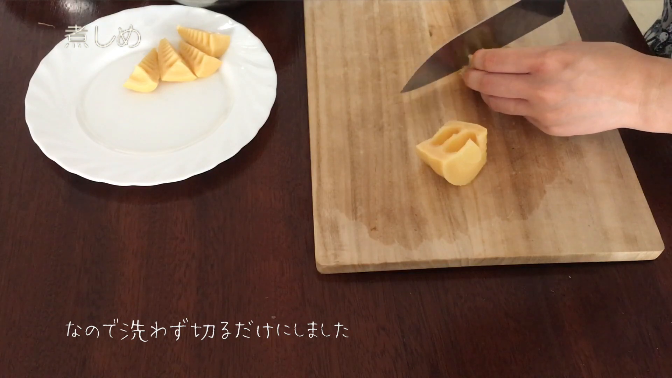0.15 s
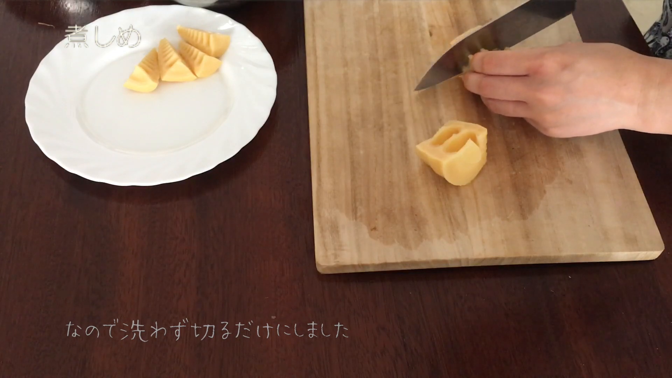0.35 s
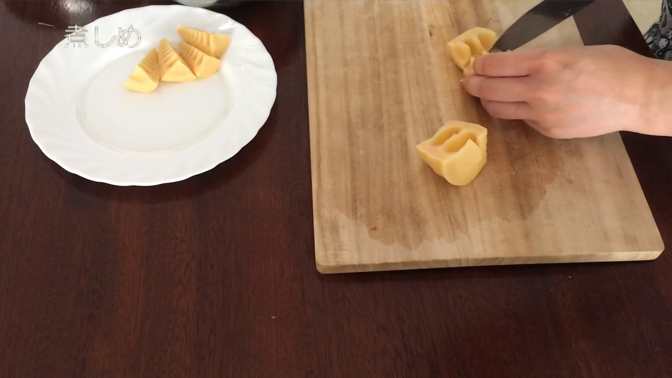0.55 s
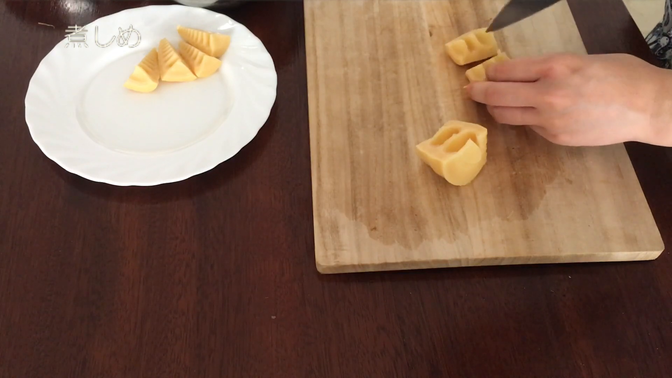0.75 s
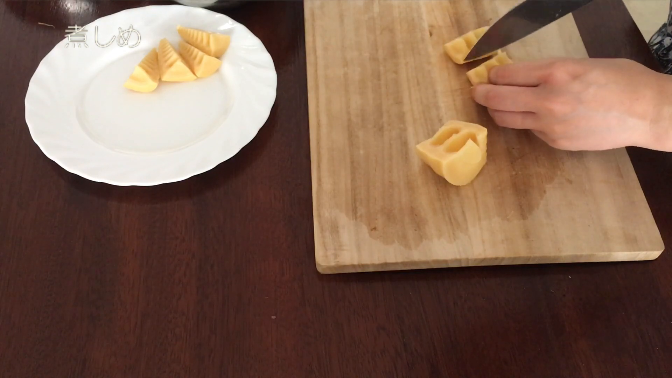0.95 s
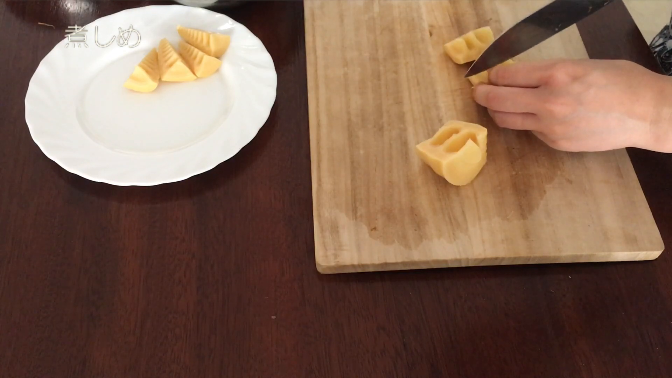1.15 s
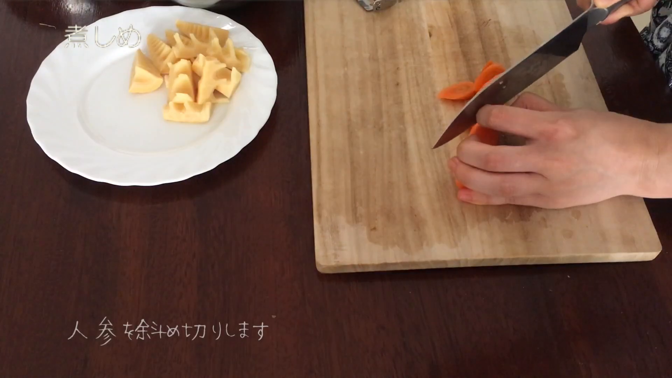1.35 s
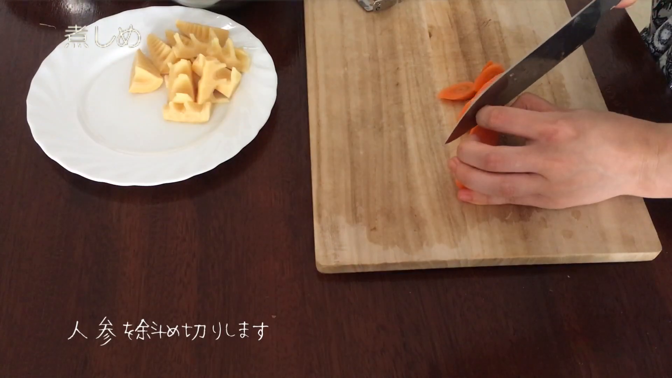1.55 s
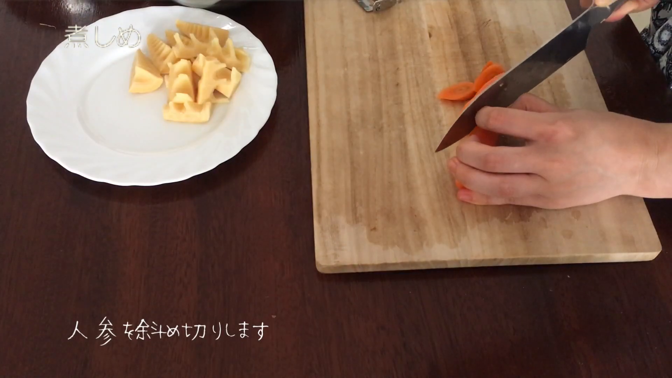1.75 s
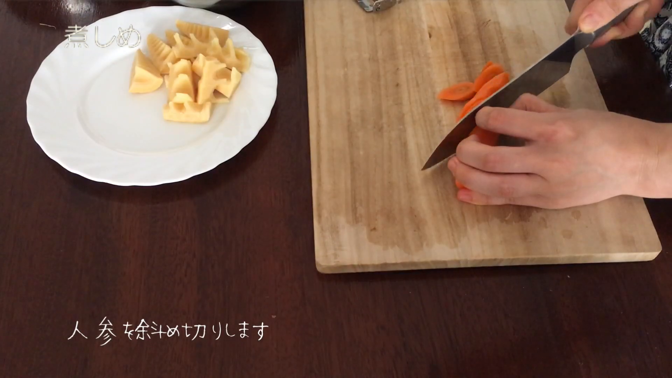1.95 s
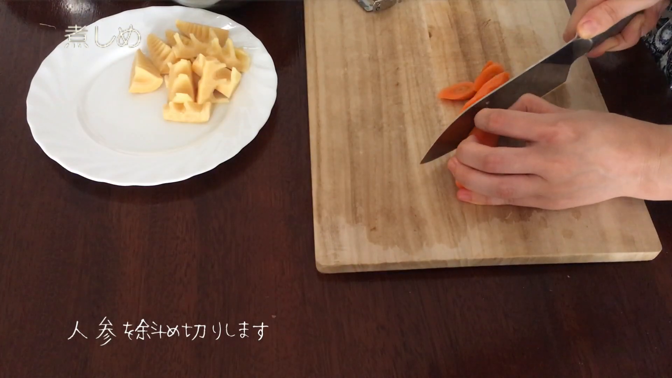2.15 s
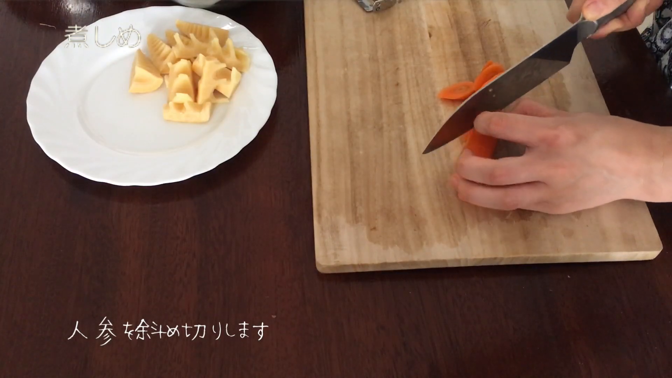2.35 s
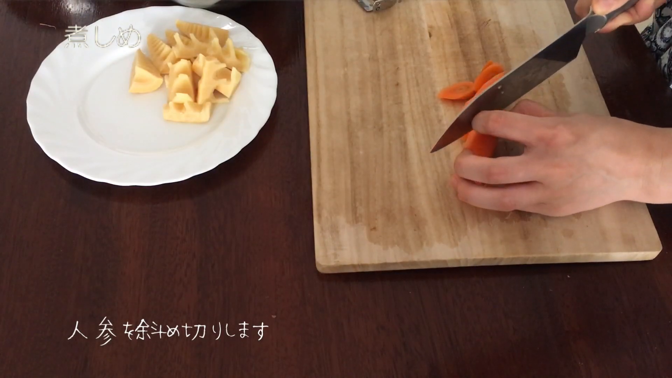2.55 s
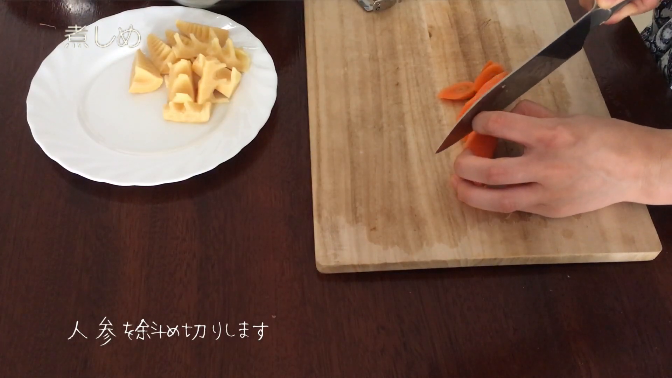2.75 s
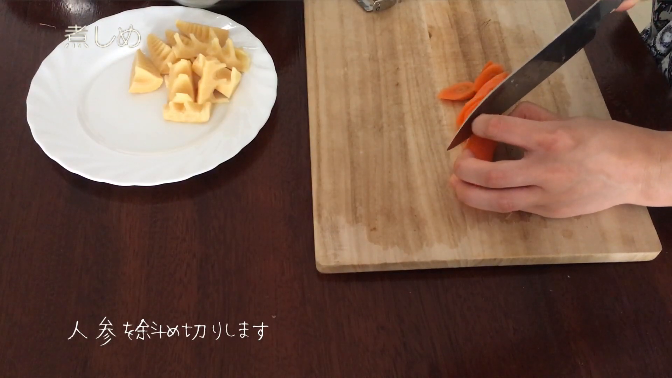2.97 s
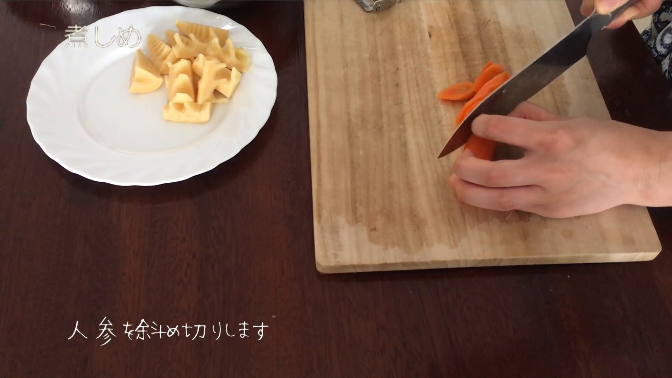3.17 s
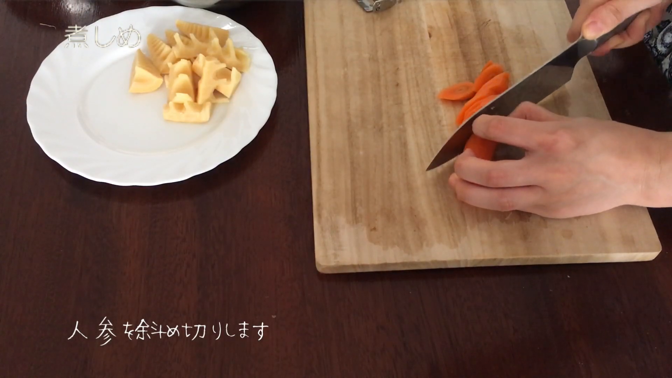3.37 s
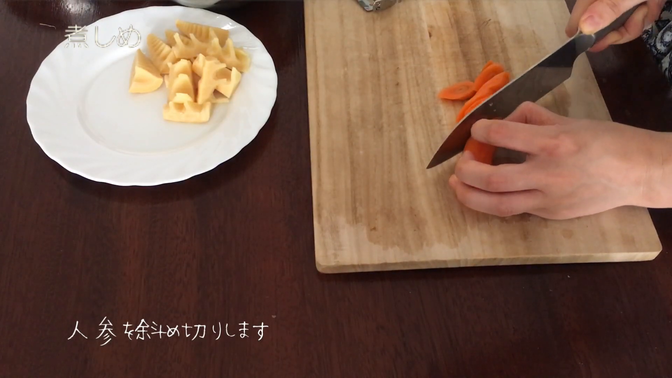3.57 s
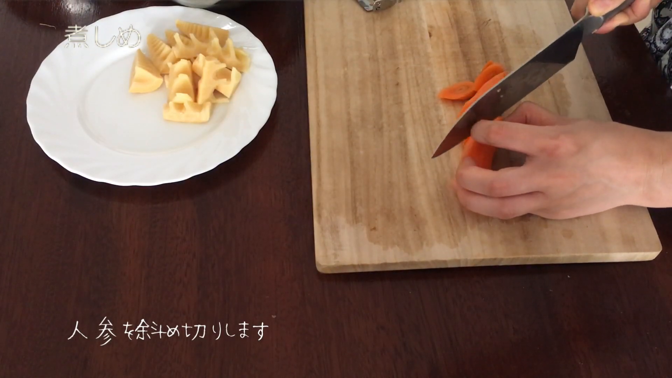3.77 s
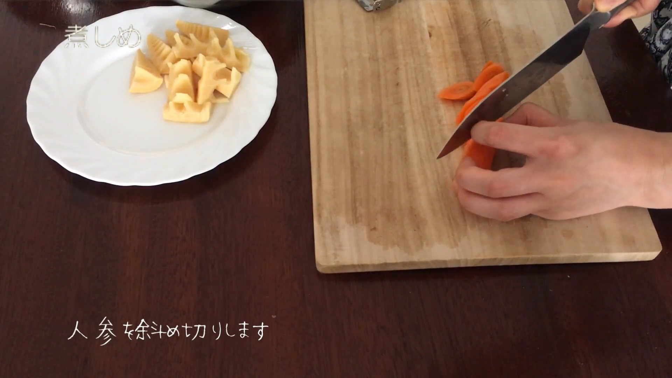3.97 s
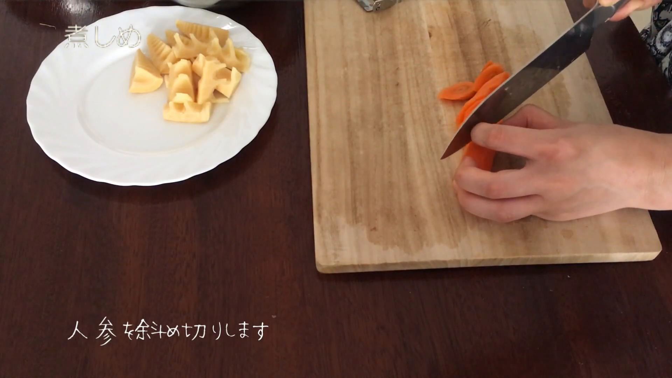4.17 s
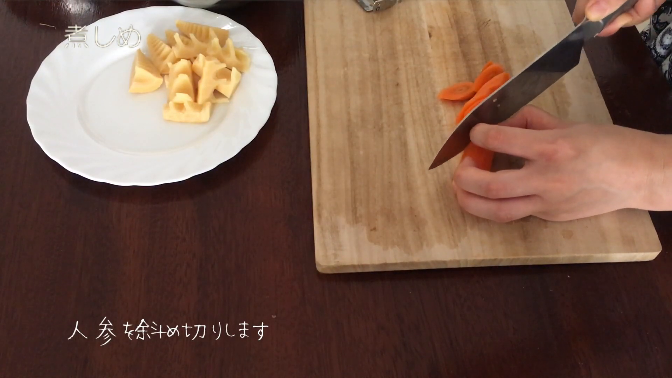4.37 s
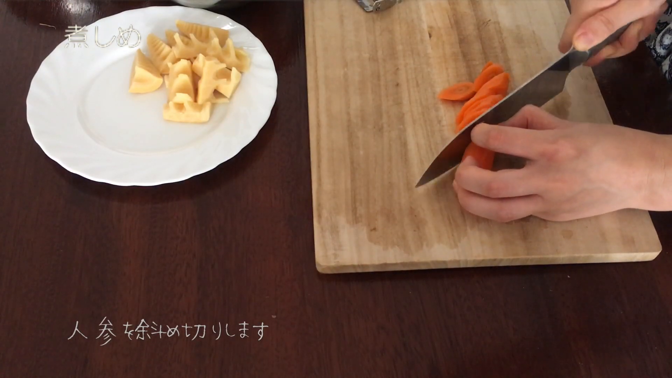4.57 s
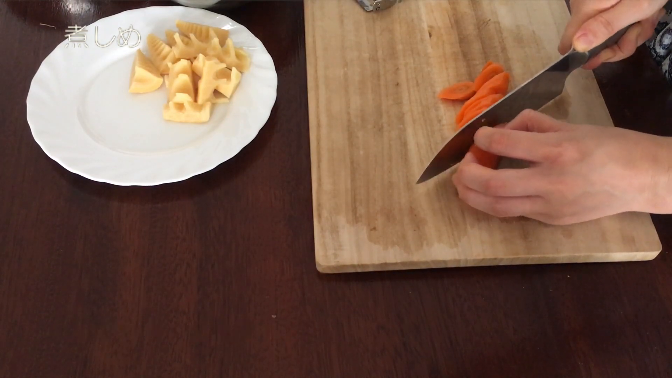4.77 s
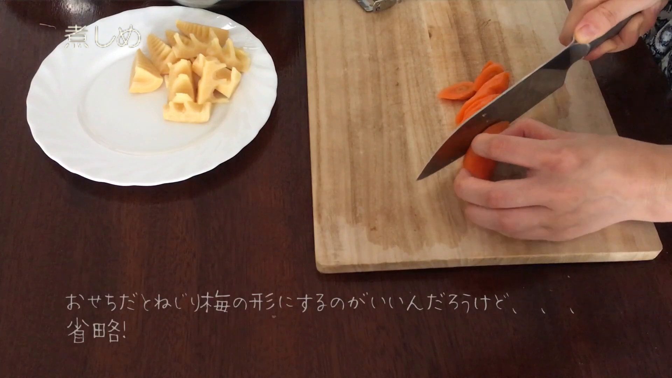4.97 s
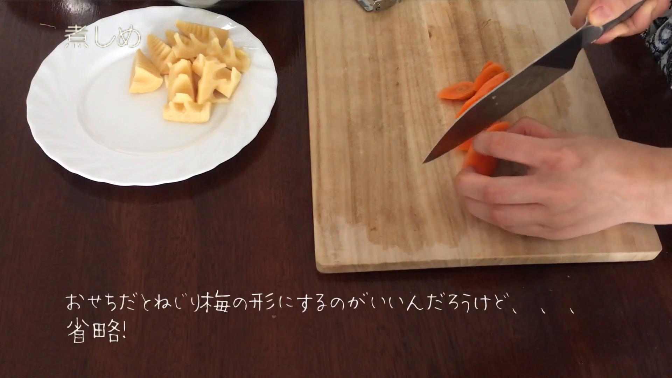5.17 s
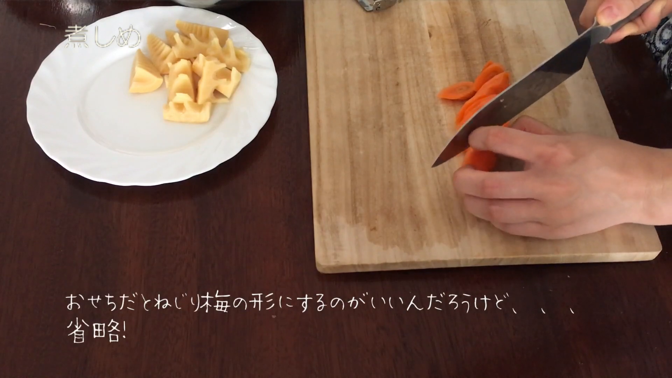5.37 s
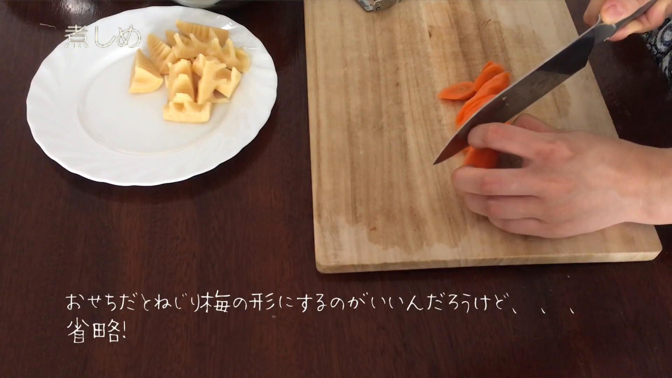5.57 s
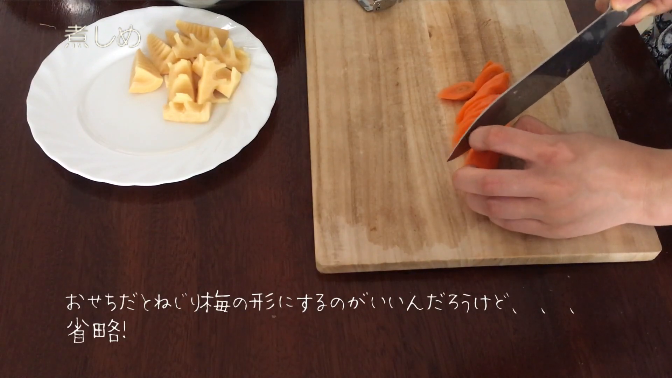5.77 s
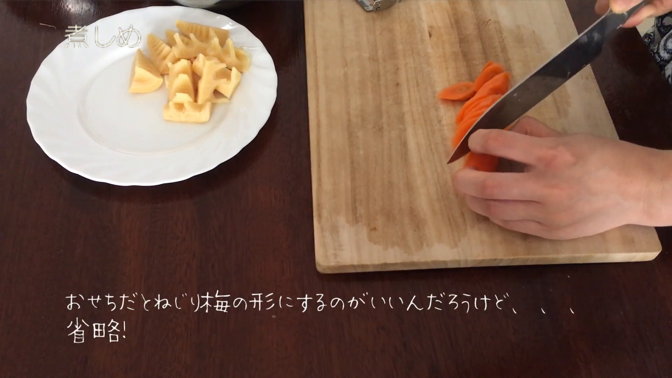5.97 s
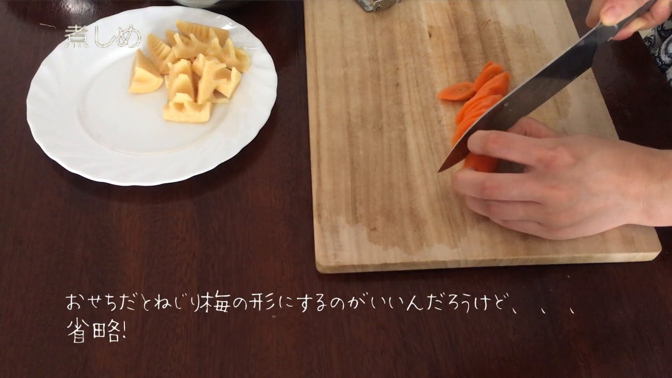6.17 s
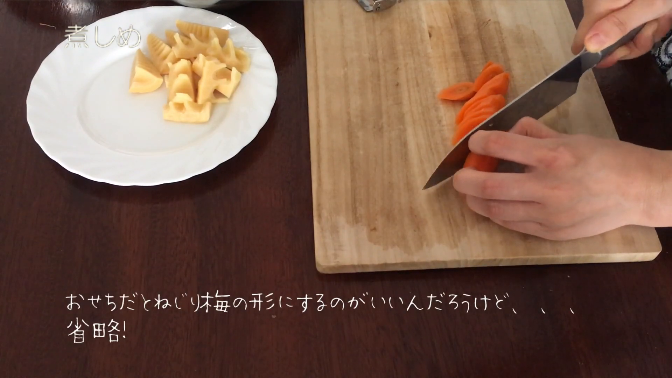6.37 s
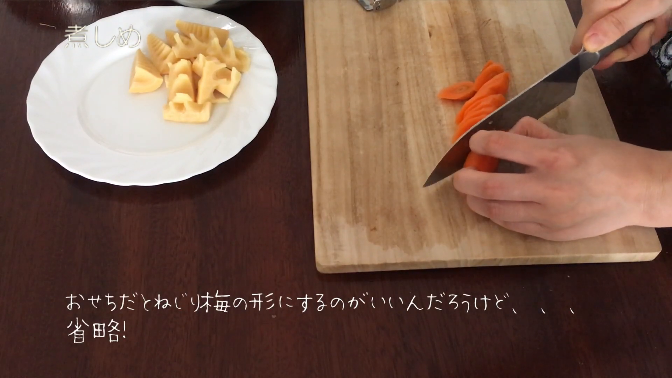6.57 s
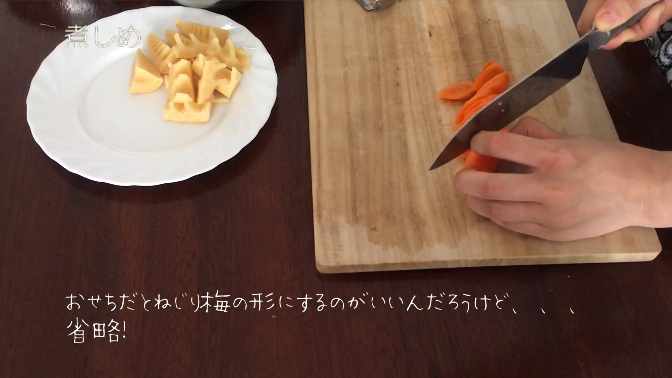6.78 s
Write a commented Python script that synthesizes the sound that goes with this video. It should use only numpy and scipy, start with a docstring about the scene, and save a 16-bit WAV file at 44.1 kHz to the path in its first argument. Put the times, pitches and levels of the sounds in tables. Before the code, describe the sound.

A knife saws through a carrot in four slices, each ending in a hard sharp knock on a wooden board in a lively kitchen.

```python
"""Knife and carrot in a hard-walled kitchen

A kitchen knife is drawn through a soft shoot, then saws four slices off a carrot on a wooden board.
Strokes are gritty noise, coloured as a tearing hiss and passed through resonances of the vegetable as rubbing.
Each cut ends in a fibre rush and a knock, a sum of dying board modes; the steel blade pings when brushed.
Scattered echo taps make the kitchen ring on, over room noise, a wavering hum and a thin whine that stops early.
"""
import sys
import numpy as np
from scipy import signal
from scipy.fft import rfft, irfft
from scipy.io import wavfile
from scipy.ndimage import uniform_filter1d

SR = 44100
rng = np.random.default_rng(int(sys.argv[2]) if len(sys.argv) > 2 else 0)


def wav_out(sig):
    """Save sig, one row per channel (or a flat mono array), as 16-bit PCM at SR to the path in sys.argv[1]."""
    wavfile.write(sys.argv[1], SR, np.round(np.clip(np.atleast_2d(sig).T, -1, 1) * 32767).astype(np.int16))


N = 301203  # samples in the scene

# Spectrum of tearing fibres: (frequency [Hz], relative density [dB per Hz])
TEARING_COLOUR = [(600, -43.5), (1500, -16), (2500, -6), (3300, -11.5), (4120, -7), (5000, -14.5),
                  (6000, -11), (7500, -15.5), (11400, -13.5), (15100, -11.5), (16000, -21.5)]
# Blade meeting board, one row a blow: (time [s], blow [dB], contact time [ms], last split of the fibres [dB],
# second contact against the first [dB], its delay [ms], slice sliding off [dB], change of the upper modes [dB])
BOARD_KNOCKS = [(.3966, -33, 0.43, -78, -6, 1.06, -91, -6),
                (2.0325, -14.5, 0.11, -39.5, -22.5, 1.85, -52.5, 1),
                (3.3583, -15, 0.15, -43, -22, 2, -55, -8), (4.6275, -15, 0.15, -39.5, -25, 4.5, -54, -4.5),
                (6.4170, -15.5, 0.067, -40, -17, 2.6, -52.5, 3)]
# Strokes of the edge through the shoot: (start [s], time to bite [s], length [s], hiss of tearing fibres [dB],
# its drift over the stroke [dB], rubbing above the hiss [dB])
STROKES_IN_SHOOT = [(0.099, 0.06, 0.16, -88, 4, 4.5), (0.381, .03, .25, -74, -6, 8),
                    (0.619, 0.048, 0.078, -76, 0.5, 6)]


def gain_of(db):
    """Turns dB into amplitude gain."""
    return 10 ** (np.asarray(db) / 20)


def evened(x):
    """Scales to rms 1."""
    return x / np.sqrt(np.mean(x ** 2) + 1e-20)


def read(points, hz):
    """Reads a table of (Hz, value) on a log frequency axis."""
    f, value = np.transpose(points)
    return np.interp(np.log(hz + 1), np.log(f + 1), value)


def add(mix, s, sound):
    """Mixes a sound in at time s, cut short where the mix ends."""
    part = mix[round(s * SR):][:len(sound)]
    part += sound[:len(part)]


def coloured(x, points):
    """Filters x by a table of (Hz, dB)."""
    hz = np.fft.rfftfreq(len(x), 1 / SR)
    return irfft(rfft(x) * gain_of(read(points, hz)), len(x))


def resonate(x, hz, width):
    """Shifts hz down to zero, smooths twice and shifts back: a steep resonance of gain 1 that may glide."""
    turn = np.exp(2j * np.pi * np.cumsum(hz * np.ones(len(x))) / SR)
    r = np.exp(-np.pi * width / SR)
    smoothed = signal.lfilter([(1 - r) ** 2], [1, -2 * r, r * r], x / turn)
    return 2 * (turn * smoothed).real


def ring(modes, spread_db):
    """Sums dying modes, neighbours in opposite sense; where the blow lands shifts their balance by chance."""
    build_cycles = 0.76  # a mode takes about this many cycles to build up, so the bass comes last
    t = np.arange(SR // 2) / SR
    chance = rng.standard_normal(len(modes))
    total = np.zeros(len(t))
    for k, (hz, db, t60) in enumerate(modes):
        decay = gain_of(db + spread_db * chance[k] - 60 * t / t60)
        build = 1 - np.exp(-(hz * t / build_cycles) ** 2)
        total += (-1) ** k * decay * build * np.sin(2 * np.pi * hz * t)
    return total


def grit(count, per_s, uneven_db):
    """Scatters dense tiny clicks of uneven size over a bed of noise."""
    size = gain_of(uneven_db * np.minimum(rng.exponential(1, count), 4))
    size = size * (rng.random(count) < per_s / SR)
    return evened((size + 0.31) * rng.standard_normal(count))


def patchy(x, patch_db):
    """Pressure and angle keep changing, so patches of the spectrum swell and fade."""
    z = signal.stft(x, nperseg=256, noverlap=192)[2]
    across_bands = uniform_filter1d(rng.standard_normal(z.shape), 5, 0)
    patches = evened(uniform_filter1d(across_bands, 25, 1))
    return signal.istft(z * gain_of(patch_db * patches), nperseg=256, noverlap=192)[1][:len(x)]


def cut(body, glide, start, bite, length, hiss_db, drift_db, rub_db):
    """Fibres tear under the edge; the same rubbing sounds through the vegetable, its pitch rising by glide."""
    bite_db, release_db_per_s = 21.5, 261.5  # rise while the edge bites, fall once it eases off
    # all is over when the blade meets the board
    lands = min(row[0] for row in BOARD_KNOCKS if row[0] > start + bite)
    t = np.arange(0, min(length + .15, lands - start), 1 / SR)
    level_db = hiss_db - bite_db * np.clip(1 - t / bite, 0, 1)
    level_db += drift_db * np.clip((t - bite) / (length - bite), 0, 1)
    level_db -= release_db_per_s * np.maximum(t - length, 0)
    drive = patchy(grit(len(t), 5000, 1.2), 1.8)
    hiss = evened(coloured(drive, TEARING_COLOUR))
    # pitch factor, 1 at the start of the second stroke in the shoot
    rise = 1 + glide * (start + t - STROKES_IN_SHOOT[1][0])
    rub = np.zeros(len(t))
    for k, (hz, width, db) in enumerate(body):
        rub += (-1) ** k * gain_of(db) * resonate(drive, hz * rise, width)
    return start, gain_of(level_db) * (hiss + evened(rub) * gain_of(rub_db))


def knock(mix_s, db, contact_ms, split_db, second_db, delay_ms, slide_db, upper_db):
    """The fibres give way in a swelling rush, the edge lands twice and rings the board, the slice slides off."""
    # Modes of the wooden board: (frequency [Hz], relative level [dB], t60 [s])
    board_modes = [(200, -15.5, 0.052), (246, -6, 0.032), (282, -22, 0.18), (367, -1, 0.03),
                   (484, -7.5, 0.01), (523, -15.5, 0.081), (629.3, -8.5, 0.057), (760.5, -10, 0.015),
                   (892, -20, 0.025), (916, -13, 0.012), (1060, -7, 0.023), (1225, -6, 0.03),
                   (1444, 5, 0.015), (1633, 2, 0.017), (2030, -14.5, 0.017), (2148, -15, 0.029),
                   (2366, -14.5, 0.02), (2560, -12, 0.014), (2784, -12, 0.016), (3260, -19, 0.015),
                   (3700, -24.5, 0.012), (4220, -11.5, .01), (5780, -26.5, 0.0086)]
    # Wet face sliding on steel: (frequency [Hz], relative level [dB])
    slide_colour = [(1500, -31.5), (3000, 0.5), (6000, -4), (9000, -9), (12000, 4), (14000, -9.5),
                    (16000, -11.5)]
    lead = .058  # s that the split starts before the blow
    t = np.arange(round(.2 * SR)) / SR - lead  # 0 at the blow

    rush_db = split_db + 990 * np.minimum(t, 0) - 3100 * np.maximum(t - .002, 0)
    rush = evened(coloured(grit(len(t), 14000, 0.9), TEARING_COLOUR)) * gain_of(rush_db)

    sliding = np.clip((t - .011) / 0.0026, 0, 1) * gain_of(slide_db - 3400 * np.maximum(t - .045, 0))
    slide = evened(coloured(patchy(rng.standard_normal(len(t)), 4.1), slide_colour)) * sliding

    ms = np.arange(400) * 1000 / SR
    push = np.exp(-((ms - 2 * contact_ms) / contact_ms) ** 2)  # a softer contact dulls the blow
    blow = push / push.sum()
    add(blow, delay_ms / 1000, gain_of(second_db) * push / push.sum())
    board = ring([(hz, level + upper_db * (hz > 3000), t60) for hz, level, t60 in board_modes], 1)
    # too small to radiate bass
    board = signal.sosfilt(signal.butter(2, 180, "high", fs=SR, output="sos"), board)

    sound = np.zeros(SR)
    add(sound, 0, rush + slide)
    add(sound, lead, gain_of(db) * signal.fftconvolve(board, blow)[:SR // 2])
    return mix_s - lead, sound


def touch(s, snap_db, ring_db):
    """A brushed blade gives a short dry snap of noise and a ping of its steel modes."""
    # Modes of the steel blade: (frequency [Hz], relative level [dB], t60 [s])
    blade_modes = [(5330, -2, 0.36), (6420, 0, .15), (8800, 8, 0.17), (9100, 1, 0.12), (10100, 0, 0.089),
                   (11000, 2.5, 0.3), (11600, -7.5, .2), (12300, 6, .12), (13920, -12, 0.1),
                   (14460, 7, 0.2)]
    # Spectrum of the snap: (frequency [Hz], relative level [dB])
    snap_colour = [(500, -18.5), (2000, 3), (4000, -3), (9000, -4), (16000, -9)]
    t = np.arange(SR // 2) / SR
    snap_fade = gain_of(snap_db - 60 * t / .014)  # falls 60 dB in 14 ms
    snap = evened(coloured(rng.standard_normal(len(t)), snap_colour)) * snap_fade
    ping = ring(blade_modes, 4)
    return s, gain_of(ring_db) * ping + snap


def kitchen(x):
    """A few first echoes, then sparse taps of random sign, each band dying at its own speed."""
    # Late decay of the room: (frequency [Hz], t60 [s])
    room_decay = [(200, 1.38), (530, 1.247), (1390, 1.077), (3680, 0.91), (9700, 0.72)]
    # Colour of the echo: (frequency [Hz], gain [dB])
    echo_colour = [(200, 0.5), (400, -1.5), (650, 0.5), (850, 2.5), (1100, 4.5), (1350, -5), (1550, -12.5),
                   (1750, -6), (2000, -1.5), (2800, 1.5), (3400, -5), (4500, -7.5), (6000, -7.5),
                   (9000, -4), (12000, -9.5)]
    # First echoes off the walls: (delay [s], level [dB])
    wall_echoes = [(.005, -15.5), (.009, -17), (0.012, -10), (.02, -15.5)]
    taps = np.zeros(SR)
    at = np.arange(500, SR - 20, 20)
    taps[at + rng.integers(0, 20, len(at))] = rng.choice([-1., 1.], len(at))
    hz, t, z = signal.stft(taps, SR, nperseg=256)
    early_db = 6.17 * np.exp(-t / 0.049)  # near tiles and cupboards answer first and loudest
    decay_db = early_db - 60 * t / read(room_decay, hz)[:, None]
    tail = signal.istft(z * gain_of(decay_db), SR, nperseg=256)[1][:SR]
    tail = tail / np.linalg.norm(tail) * gain_of(-3.0)
    for s, db in wall_echoes:
        add(tail, s, gain_of([db]))
    return coloured(signal.fftconvolve(x, tail)[:N], echo_colour)


def air():
    """Steady room noise with small drifting patches, the wavering hum, and a thin whine that stops early."""
    # Spectrum of the room noise: (frequency [Hz], relative density [dB per Hz])
    air_colour = [(15, -36), (25, -10), (53, -1.5), (97, -5), (166, -2.5), (190, -5.5), (270, -9.5),
                  (326, -22), (373, -22.5), (416, -22), (887, -33.5), (1940, -41.5), (2990, -47.5),
                  (14400, -60), (16000, -63)]
    # Wavering tones of the appliance hum: (frequency [Hz], width of each smoothing [Hz], level [dB])
    hum_tones = [(52, 9.6, -67), (122.3, 19, -67), (164.8, 6.6, -58.5)]
    # Faint thin tones: (frequency [Hz], level [dB])
    whine_tones = [(2724, -94), (2972, -90), (4560, -99)]
    air_db, hum_swell_db = -53, 1.5  # rms level of the noise; rms depth of the hum's slow swelling
    whine_end_s, whine_width_hz = 1.22, 16

    frames, hz = N // 512 + 5, np.fft.rfftfreq(2048, 1 / SR)
    a, b, patches = rng.standard_normal((frames, 1025, 3)).T
    patches = evened(uniform_filter1d(uniform_filter1d(patches, 10, 0), 10, 1))
    z = (a + 1j * b) * gain_of(read(air_colour, hz)[:, None] + 0.85 * patches)
    noise = gain_of(air_db) * evened(signal.istft(z, nperseg=2048, noverlap=1536)[1][:N])

    drive, t = rng.standard_normal(N), np.arange(N) / SR
    waver = sum(np.sin(2 * np.pi * (f * t + rng.random())) for f in np.geomspace(.3, 2, 8))
    swell = gain_of(hum_swell_db * evened(waver))
    hum = sum(gain_of(db) * evened(resonate(drive, f, width)) for f, width, db in hum_tones)
    whine = sum(gain_of(db) * evened(resonate(drive, f, whine_width_hz)) for f, db in whine_tones)
    return noise + whine * (t < whine_end_s) + swell * hum


def scene():
    """Mixes knife, vegetables and board near the microphone with a far thump, the room's echo and its air."""
    # Resonances of the softer shoot, then of the carrot:
    # (frequency [Hz], width of each smoothing [Hz], relative level [dB])
    shoot_body = [(534, 79, 3), (1090, 430, -4), (1500, 180, -5), (2430, 360, -6), (3810, 430, -10),
                  (5900, 890, -14.5)]
    carrot_body = [(620, 250, 0.5), (1020, 385, -7), (1550, 323, 9), (2320, 400, -0.5), (2950, 120, -6.5),
                   (4240, 450, -2), (5870, 800, -19.5)]
    # Strokes of the edge through the carrot; columns as for STROKES_IN_SHOOT:
    # (start [s], time to bite [s], length [s], hiss [dB], drift [dB], rubbing above the hiss [dB])
    carrot_strokes = [(1.4, 0.024, 0.37, -79.5, -8.5, -8), (1.662, 0.02, 0.22, -74, 0.5, 8.5),
                      (1.868, 0.039, 0.18, -65.5, 9.5, 3.5), (2.78, 0.054, 0.19, -79, -2.5, -3),
                      (3.008, 0.026, 0.14, -67, -6, 8), (3.212, 0.054, 0.13, -59.5, 2.5, 3),
                      (4.0, 0.031, .2, -79.5, -9.5, 5), (4.21, 0.023, 0.18, -73, -1.5, 5.5),
                      (4.376, 0.041, .105, -77.5, 12.5, 7), (4.476, 0.016, 0.13, -65.5, 5.5, 4),
                      (5.764, .014, 0.15, -77, -10, -6.5), (5.962, 0.036, 0.19, -72.5, -8.5, 7.5),
                      (6.196, 0.038, 0.21, -68, 6.5, 4.5)]
    # Light touches of the blade: (time [s], dry snap at its start [dB], ring [dB])
    blade_touches = [(2.559, -86.5, -88), (2.669, -71, -100), (2.702, -67, -90), (2.796, -73, -99),
                     (4.021, -91.5, -106), (4.4783, -42.5, -91), (5.133, -81, -100), (5.468, -84, -96.5),
                     (5.497, -72, -88), (5.511, -79, -101.5), (5.772, -86, -102)]
    # Something set down across the room: (blow [dB], contact time [ms], split [dB], second contact [dB],
    # its delay [ms], sliding [dB], change of the upper modes [dB])
    far_thump = (-35, 0.385, -99, -4, 7.5, -99, -6)
    thump_s = 1.252
    shoot_glide_per_s = 0.27  # share by which the pitch of the shoot rises each second

    near, far = np.zeros(N), np.zeros(N)
    for row in STROKES_IN_SHOOT:
        add(near, *cut(shoot_body, shoot_glide_per_s, *row))
    for row in carrot_strokes:
        add(near, *cut(carrot_body, 0, *row))
    for row in BOARD_KNOCKS:
        add(near, *knock(*row))
        add(near, *touch(row[0], row[1] - 38, row[1] - 62))  # every knock also shakes the blade a little
    for row in blade_touches:
        add(near, *touch(*row))
    add(far, *knock(thump_s, *far_thump))
    direct = near + gain_of(-9) * far  # distance weakens the direct thump, so it is heard mostly as echo
    return (direct + kitchen(near + far) + air())[None]


def record(dry):
    """The microphone drops the deepest bass and rounds off the highest peaks; then the band limit."""
    edge_hz = 15950  # upper band limit
    thinned = signal.sosfilt(signal.butter(8, 43, "high", fs=SR, output="sos"), dry)
    rounded = .24 * np.tanh(thinned / .24)
    band_limit = signal.firwin(511, edge_hz, window=("kaiser", 9), fs=SR)
    return signal.oaconvolve(rounded, band_limit[None], "same")


dry = scene()
out = record(dry)
wav_out(out)
```